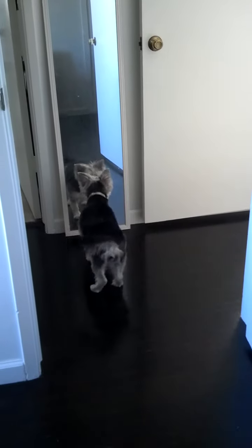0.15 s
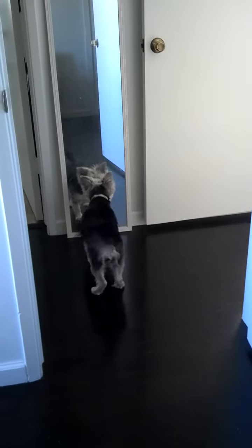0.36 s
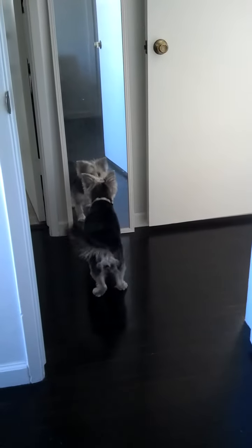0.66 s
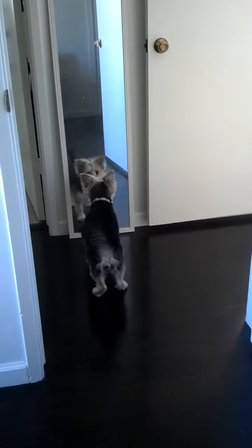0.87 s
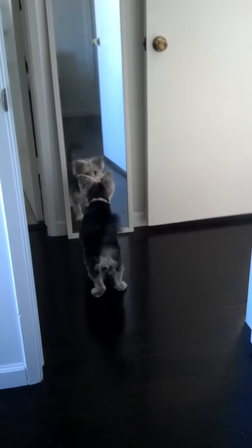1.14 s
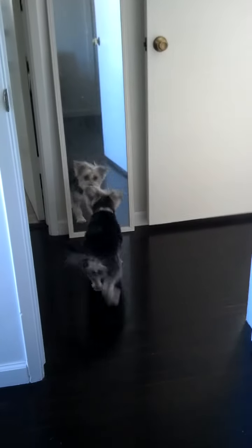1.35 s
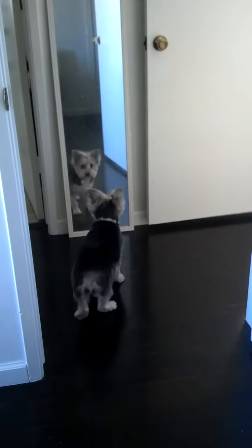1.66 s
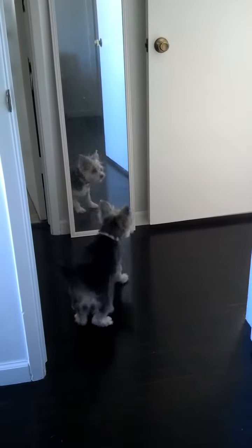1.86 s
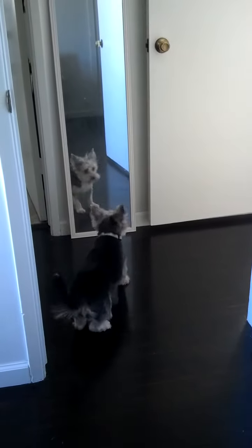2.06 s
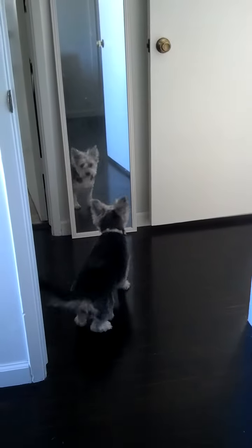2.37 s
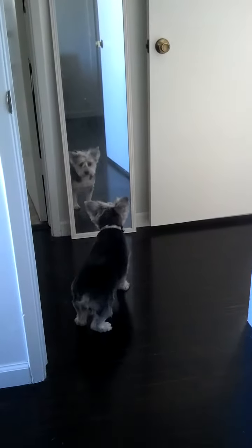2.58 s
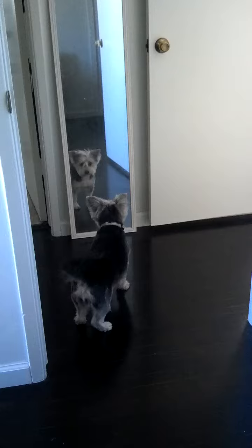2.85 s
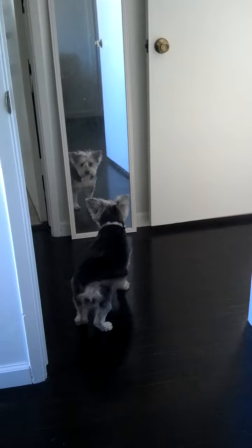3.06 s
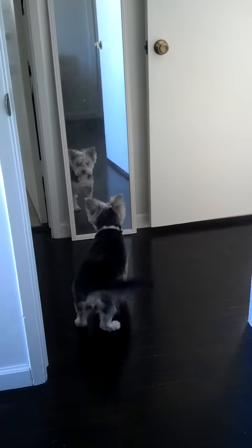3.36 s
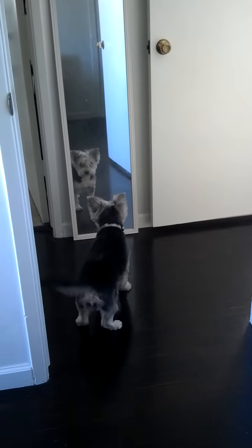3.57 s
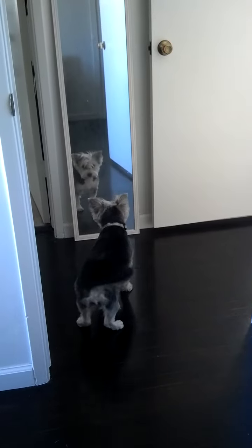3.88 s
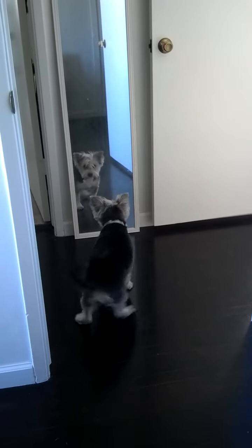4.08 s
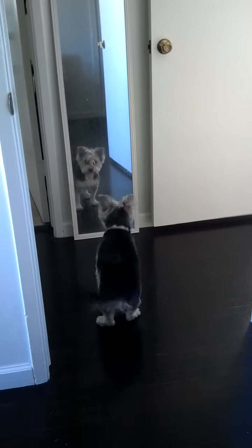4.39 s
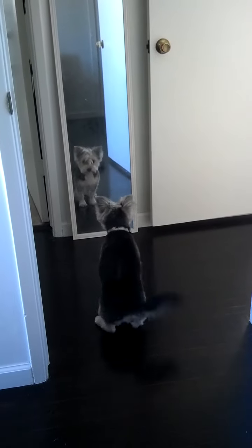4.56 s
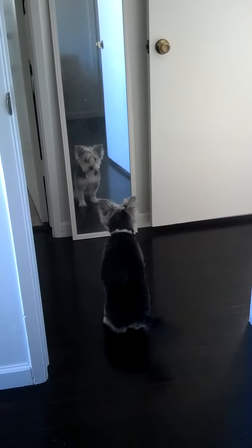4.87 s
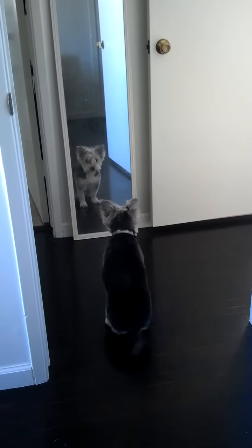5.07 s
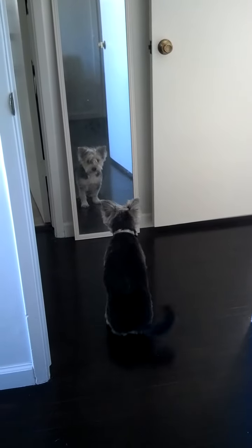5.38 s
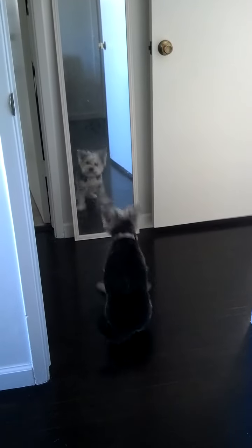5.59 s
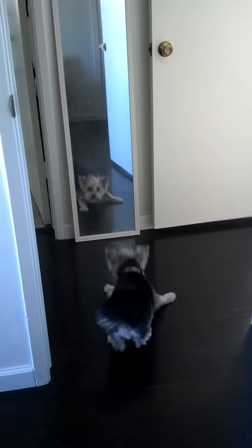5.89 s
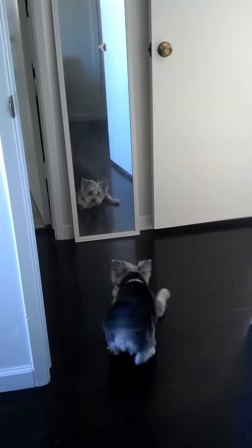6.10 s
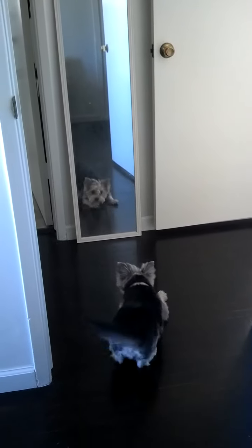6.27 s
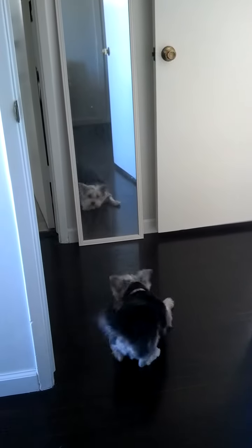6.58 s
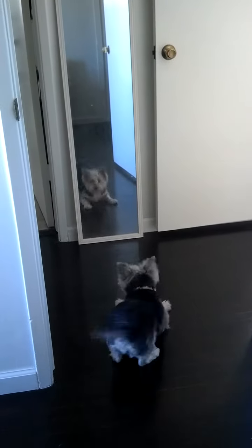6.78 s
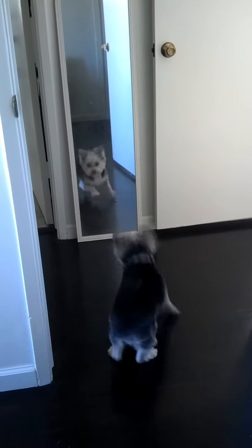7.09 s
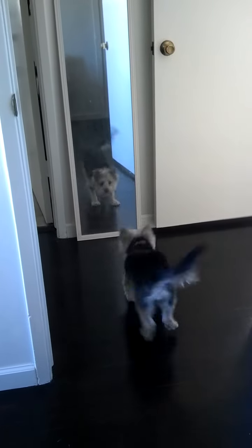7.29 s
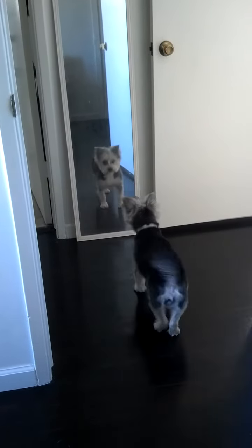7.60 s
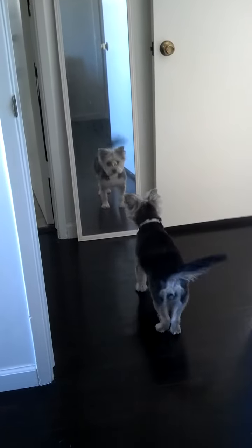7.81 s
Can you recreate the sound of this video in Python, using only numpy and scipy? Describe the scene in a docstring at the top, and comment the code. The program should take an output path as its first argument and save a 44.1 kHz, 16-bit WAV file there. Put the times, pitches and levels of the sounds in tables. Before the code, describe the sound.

In a quiet, bare hallway, a small dog scuffs the wooden floor, whimpers faintly, then barks five times, about half a second apart. Claws click between calls. After a lull of soft whines and ticks comes the sharpest yelping bark, a low grunting bark, then heavier paw thuds and a last bark. A phone close behind catches plenty of room echo over a faint house rush.

```python
"""A small terrier barks, whines and growls at itself in a hallway mirror, a step away from a phone.
Its voice is a source and filter: harmonic vocal folds ring the throat and mouth, beside noisy breath.
Claws, paws and the dog's weight on the wooden floor are decaying or swelling bursts of shaped noise.
The bare hallway adds a diffuse decaying tail, over a faint noise of the house.
The phone widens the sound of its two microphones by subtracting delayed copies."""
import sys
import numpy as np
from scipy import signal
from scipy.fft import rfft, irfft, next_fast_len
from scipy.io import wavfile
from scipy.ndimage import map_coordinates

SR = 44100
rng = np.random.default_rng(int(sys.argv[2]) if len(sys.argv) > 2 else 0)


def unload_wav(signal):
    """Save mono or channel-first audio to the path in sys.argv[1] as 16-bit WAV at rate SR, clipped to [-1, 1]."""
    wavfile.write(
        sys.argv[1],
        SR,
        np.round(np.clip(np.atleast_2d(signal).T, -1, 1) * 32767).astype(np.int16),
    )


N = 350154  # samples


def amp(db):
    """Logarithmic level: decibels to amplitude gain."""
    return 10 ** (np.asarray(db) / 20)


def unit(x):
    """Normalisation: x scaled to rms 1."""
    return x / np.sqrt(np.mean(x ** 2) + 1e-20)


def along(points, hz):
    """Logarithmic frequency scale: (Hz, value) points interpolated on a log axis."""
    point_hz, values = np.transpose(points)
    return np.interp(np.log(hz + 1), np.log(point_hz), values)


def wobble(n, rate):
    """Band-limited fluctuation: a smooth random curve of n samples, rate knots a second."""
    knots = rng.standard_normal(int(n * rate / SR) + 4)
    return map_coordinates(knots, [np.arange(n) * rate / SR])


def filtered(x, response):
    """Linear filtering: the spectrum of x times a response of frequency."""
    size = next_fast_len(x.shape[-1] + SR // 4)
    spectrum = rfft(x, size) * response(np.fft.rfftfreq(size, 1 / SR))
    return irfft(spectrum, size)[..., :x.shape[-1]]


def coloured(x, points, size=2048):
    """Minimum phase: x through a causal filter with the given (Hz, dB) shape."""
    gain = amp(along(points, np.fft.rfftfreq(size, 1 / SR)))
    cepstrum = irfft(np.log(gain))
    # folding the cepstrum onto positive times makes the filter causal
    cepstrum[1:size // 2] *= 2
    cepstrum[size // 2 + 1:] = 0
    impulse = irfft(np.exp(rfft(cepstrum)))
    return signal.oaconvolve(x, impulse)[:len(x)]


def noise(points):
    """Random noise: white noise given a spectral shape and rms 1."""
    return unit(coloured(rng.standard_normal(N), points))


def add(track, s, x):
    """Superposition: mix x into the track at s seconds."""
    part = track[max(round(s * SR), 0):][:len(x)]
    part += x[:len(part)]


# spectrum of the faint rush of the house: frequency_hz [Hz], density_db [dB per Hz, relative]
HOUSE_SPECTRUM = [(25, -10), (70, -1), (150, 14), (500, 4.5), (1000, -7), (4000, -16.5), (10500, -24.5),
                  (15500, -20.5)]


def background(floor_db=-61, shared=1.0):
    """Partial coherence: a faint rush of the house, partly shared by the microphones."""
    common = shared * noise(HOUSE_SPECTRUM)
    separate = np.array([noise(HOUSE_SPECTRUM), noise(HOUSE_SPECTRUM)])
    return amp(floor_db) * (common + separate)


# paws and fur sliding on the floor: peak_s [s, hardest push], level_db [dB, relative],
# length_s [s, between the points where the push is 1/e of its peak]
SCUFF_STROKES = [(0.0, -48.5, 0.12), (1.332, -37, 0.078), (1.606, -39, 0.38), (2.272, -51.5, 0.14),
                 (4.213, -39, 0.069), (4.409, -58.5, 0.16), (4.81, -66, 0.043), (5.621, -39, 0.12),
                 (6.038, -50.5, 0.12), (6.971, -50, 0.4), (7.362, -48, 0.29)]
# spectrum of the rubbing: frequency_hz [Hz], level_db [dB]
SCUFF_SPECTRUM = [(40, -5), (130, 8.5), (800, 4), (1400, -3), (2200, -1), (3200, -5.5), (4500, -1.5),
                  (6000, -7), (16000, -17.5)]


def scuffs(scuff_db=-8, grain_db=4.0, slip_db=2.5):
    """Stick-slip friction: pads and fur catch and slip on the boards; each stroke swells and fades."""
    t = np.arange(N) / SR
    rub = sum(amp(db) * np.exp(-(2 * (t - s) / length_s) ** 2) for s, db, length_s in SCUFF_STROKES)
    # fine grains ride on slower slips
    grains = unit(amp(grain_db * wobble(N, 540) + slip_db * wobble(N, 50)))
    return amp(scuff_db) * rub * grains * noise(SCUFF_SPECTRUM)


EDGE_S = 0.0063  # the voice switches on and off over this time [s]


def gate(n):
    """Onset and offset ramps: a soft on-off gate of n samples."""
    i = np.arange(n)
    return np.clip(np.minimum(i, n - i) / (EDGE_S * SR), 0, 1)


REGISTER_HZ = 785.7  # strained folds swell every second cycle below this pitch, every third above


def folds(pitch, rough, overtones_db, jitter=0.057, undertone=0.43, chaos=0.9, turbulence=0.32,
          slope_db=-4, count=7):
    """Nonlinear oscillation: a harmonic tone that strain breaks into sidebands and rattle; also its phase."""
    n = len(pitch)
    unsteady = .014 * wobble(n, 90) + jitter * rough * wobble(n, 520)
    phase = 2 * np.pi * np.cumsum(pitch * (1 + unsteady)) / SR
    tone = np.sin(phase)
    for k in range(2, count):
        # overtones slope by slope_db per octave from the second harmonic
        tone = tone + amp(overtones_db + slope_db * np.log2(k / 2)) * np.sin(k * phase)
    # strained folds swell once in two or three cycles, which adds subharmonic sidebands
    cycles = np.where(pitch < REGISTER_HZ, 2, 3)
    slow = 2 * np.pi * np.cumsum(pitch / cycles * (1 + .09 * wobble(n, 120))) / SR
    swell = 1 + rough * (.6 * np.cos(slow) + chaos * wobble(n, 1100))
    under = undertone * rough * np.sin(phase - slow)
    # and let a turbulent puff through in each slow cycle
    puffs = turbulence * rough * (1 + np.cos(slow)) * wobble(n, 5000)
    power = (1 + 2 * amp(overtones_db) ** 2) * (1 + rough ** 2) / 2
    return (tone * swell + under + puffs) / np.sqrt(power), phase


def resonance(hz, centre_hz, q):
    """Damped resonator: the second-order response of one cavity."""
    return 1 / (1 - (hz / centre_hz) ** 2 + 1j * hz / (centre_hz * q))


def mouth(x, throat_hz, mouth_hz, throat_q=1.297, mouth_q=6):
    """Formants: throat and mouth each ring at one resonance and pass little outside the pair."""
    def tract(hz):
        throat_ring = resonance(hz, throat_hz, throat_q)
        return (hz / throat_hz) ** 2 * throat_ring * resonance(hz, mouth_hz, mouth_q)

    cliff = signal.butter(N=6, Wn=1.14 * mouth_hz, fs=SR, output="sos")
    padded = np.pad(x, (0, SR // 20))  # room to ring on
    return signal.sosfilt(cliff, filtered(padded, tract))


WHIMPER_PEAK = .27  # loudest at this share of the length
WHIMPER_SWELL_DB, WHIMPER_FADE_DB = 7.5, 16.5  # rise before the peak, fall after it [dB]


def whimper(length_s, first_hz, last_hz, db, rough, overtones_db):
    """Frequency glide: a soft, even glide that swells and fades; the jaw does not move."""
    u = np.arange(0, length_s, 1 / SR) / length_s
    level = db - np.interp(u, [0, WHIMPER_PEAK, 1], [WHIMPER_SWELL_DB, 0, WHIMPER_FADE_DB])
    pitch = first_hz + (last_hz - first_hz) * u
    return pitch, level, rough, overtones_db, 0  # never muffled


SHUT_THROAT_HZ, SHUT_MOUTH_HZ = 281, 1600
# whimpers, grunts and huffs with the mouth nearly shut: start_s [s], length_s [s], first_pitch_hz [Hz],
# last_pitch_hz [Hz], level_db [dB, relative], roughness [0-1], overtones_db [dB], rasp_db [dB, relative]
WHIMPER_CALLS = [ (0.993, 0.091, 941, 1016, -52.5, 0.9, -1, 1), (1.385, .08, 709, 696, -43.5, .3, -23, 2),
                 (3.47, .08, 415, 416, -46, .3, -26, 0.5), (4.168, 0.086, 360.8, 338.6, -39, 0.9, -11, 29),
                 (4.364, 0.15, 409, 449, -47.5, 0.08, -31, 0), (4.45, 0.143, 684, 780, -58.5, 0, -24, 4),
                 (5.604, .045, 331.5, 401, -23.5, .3, -8.5, 1),
                 (6.08, 0.14, 510.4, 421.6, -38.5, 0.58, -31, 6),
                 (6.552, .1, 472.5, 378.3, -24, 0.93, -37, 11), (7.273, 0.071, 692, 710, -40, 0, -25, 1), ]


def whimpers():
    """Fixed formants: each nearly shut call has the same two resonances."""
    return [(s, SHUT_THROAT_HZ, SHUT_MOUTH_HZ, air_db, whimper(*shape))
            for s, *shape, air_db in WHIMPER_CALLS]


# the dog's weight landing on the boards: start_s [s], level_db [dB, relative]
PAW_LANDINGS = [(1.309, -40), (4.169, -43), (4.8, -41.5), (5.607, -37), (6.561, -47), (7.151, -27),
                (7.197, -57), (7.258, -28.5)]
# spectrum of the struck boards: frequency_hz [Hz], level_db [dB]
BOARD_SPECTRUM = [(40, -14.5), (160, 4.5), (330, -6.5), (600, -18.5), (4000, -54)]


def thuds(thud_db=-7, thud_t60=0.16):
    """Damped impact: soft paws give a dull, toneless bump on the floorboards."""
    track, t = np.zeros(N), np.arange(SR // 4) / SR
    for s, db in PAW_LANDINGS:
        decay = amp(db + thud_db - 60 * t / thud_t60)  # t60 in s
        add(track, s, decay * (1 - np.exp(-t / 0.0005)))
    return track * noise(BOARD_SPECTRUM)


# claws on the boards: start_s [s], level_db [dB, relative]
CLAW_TICKS = [(1.3106, -17), (1.3711, -20.5), (1.4506, -30), (1.626, -22.5), (1.8118, -28.5), (4.3346, -29),
              (4.517, -24), (4.7387, -25.5), (4.748, -30.5), (4.7899, -25.5), (5.5494, -33.5), (5.989, -47),
              (6.0232, -50), (6.825, -38.5), (6.8944, -35.5), (7.038, -30), (7.3358, -23.5),
              (7.5071, -26.5), (7.6162, -32)]
# spectrum of a claw on varnish: frequency_hz [Hz], level_db [dB]
CLAW_SPECTRUM = [(300, -16), (800, -5.5), (1400, -6.5), (2200, 3.5), (4500, 3), (10000, 1.5), (16000, -10)]


def claws(tick_db=-9, tick_t60=0.011, skid_db=-13, skid_t60=0.064):
    """Impact and friction: each claw gives a dry tick and skids a little on the varnish."""
    ticks, t = np.zeros(N), np.arange(SR // 6) / SR
    for s, db in CLAW_TICKS:
        skid = amp(skid_db - 60 * t / skid_t60 + 0.8 * wobble(len(t), 300))
        decay = amp(-60 * t / tick_t60) + skid
        attack = 1 - np.exp(-t / 0.00047)
        add(ticks, s, amp(db + tick_db) * decay * attack * rng.standard_normal(len(t)))
    return coloured(ticks, CLAW_SPECTRUM)


SCOOP, SCOOP_CURVE = .53, 1.3  # a bark starts this share below its pitch and scoops up during the attack
LIFT_S, SAG = 0.02634, 0.069  # how quickly the pitch lifts [s]; share of it lost as the air runs out
SWELL_DB, FADE_CURVE = 18, 1.11  # rise over the attack; above 1 the level holds before it fades
ONSET_ROUGH, STRAIN_CURVE = 0.49, 0.9  # extra roughness before the folds settle; below 1 they break up early
CLOSING_DB, THINNING_DB_PER_OCTAVE = 15.5, 13  # overtones lost as the jaw closes and as the pitch lifts
JAW_CURVE = 0.68  # the jaw opens during the attack; until then the voice is muffled


def bark(attack_s, lift_s, length_s, first_hz, lifted_hz, db, fade_db, peak_rough, end_rough, overtones_db):
    """Breath pressure: the voice scoops up and swells, its pitch lifts, then it fades, dulls and roughness drifts."""
    t = np.arange(0, length_s, 1 / SR)
    slack = np.clip(1 - t / attack_s, 0, 1)
    spent = np.clip((t - attack_s) / (length_s - attack_s), 0, 1)
    lift = (lifted_hz / first_hz) ** (.5 + .5 * np.tanh((t - lift_s) / LIFT_S))
    pitch = first_hz * lift * (1 - SCOOP * slack ** SCOOP_CURVE) * (1 - SAG * spent ** 3)
    level = db - SWELL_DB * slack - fade_db * spent ** FADE_CURVE
    rough = peak_rough + ONSET_ROUGH * slack + (end_rough - peak_rough) * spent ** STRAIN_CURVE
    overtones = overtones_db - CLOSING_DB * spent - THINNING_DB_PER_OCTAVE * np.log2(lift)
    muffled = 1 - (1 - slack) ** JAW_CURVE
    return pitch, level, rough, overtones, muffled


# barks: start_s [s], attack_s [s], lift_s [s after the start], length_s [s],
# first_pitch_hz [Hz, before scoop and sag], lifted_pitch_hz [Hz, before sag], level_db [dB, relative],
# fade_db [dB], peak_roughness and end_roughness [share, limited to 0-1 when voiced],
# overtones_db [dB, before closing and thinning], throat_hz [Hz], mouth_hz [Hz], rasp_db [dB, relative]
BARK_CALLS = [ (1.473, 0.095, 0.2, .322, 720.4, 960.3, -18, 4, 0.35, .95, -2, 486, 1920, -1),
              (1.959, 0.05, 0.069, .17, 804, 932, -14.5, 13, 0.34, 1.06, -11.5, 560, 1720, 4.5),
              (2.404, 0.081, 0.1115, .205, 817.6, 877.6, -15, 17.5, .3, 1.2, -11.5, 526, 1603, 0.5),
              (2.947, .072, .1, 0.29, 703.6, 729.7, -19.5, 13.5, 0.27, 0.43, 2.5, 560, 2040, -5),
              (3.603, .044, 0.06, .18, 717.4, 881, -14, 13, 0.4, 0.9, -6.5, 540, 1710, 2.5),
              (5.6, .03, 0.088, 0.14, 700, 1146, -10.5, 12, 0.29, 0, 4.5, 320, 1710, 1),
              (6.268, 0.07, 0.085, 0.26, 662.6, 724, -24.5, 4, 0.56, .7, -1, 334, 2020, 5),
              (7.323, .04, .073, 0.19, 696.5, 947.3, -15, 11.5, 0.14, 1.23, -14, 480, 1780, -4.5), ]


def barks():
    """Varying formants: each bark has its own throat and mouth resonances."""
    return [(s, throat_hz, mouth_hz, air_db, bark(*shape))
            for s, *shape, throat_hz, mouth_hz, air_db in BARK_CALLS]


MUFFLED_DB = 5.5  # gain of the muffled voice
# overall colour of the voice: frequency_hz [Hz], level_db [dB]
VOICE_SPECTRUM = [(110, -4.5), (300, -5), (550, -2.5), (800, -4), (1100, -4), (1500, -17), (2100, -19.5),
                  (3000, -25)]
# air through the teeth: frequency_hz [Hz], level_db [dB]
TEETH_SPECTRUM = [(2600, -25.5), (3400, 10), (4050, -9.5), (4600, 11.5), (5400, -1), (7200, 0), (9000, 9.5),
                  (11000, -16), (15500, -5.5)]
# low woof of the chest: frequency_hz [Hz], level_db [dB]
CHEST_SPECTRUM = [(35, -45.5), (80, -28.5), (180, -1), (400, -32)]


def dog(voice_db=-5, rasp_db=-38, rasp_growth=1.0, chest_db=-33):
    """Source and filter: folds sound through throat and mouth; air rasps past the teeth, the chest woofs."""
    # the band that gets out through a shut mouth
    muffle = signal.butter(N=2, Wn=(200, 480), btype="band", fs=SR, output="sos")
    voice, teeth, chest = np.zeros((3, N))
    for s, throat_hz, mouth_hz, air_db, shape in barks() + whimpers():
        pitch, db, rough, overtones_db, muffled = shape
        tone, phase = folds(pitch, np.clip(rough, 0, 1), overtones_db)
        source = gate(len(db)) * amp(db) * tone
        add(voice, s, mouth((1 - muffled) * source, throat_hz, mouth_hz))
        add(voice, s, amp(MUFFLED_DB) * signal.sosfilt(muffle, muffled * source))
        # the breath pulses with the folds
        air = gate(len(db)) * amp(rasp_growth * db) * (1 + .5 * np.cos(phase))
        add(teeth, s, amp(air_db) * air)
        add(chest, s, air)
    throaty = amp(voice_db) * coloured(voice, VOICE_SPECTRUM)
    rasp = amp(rasp_db) * teeth * noise(TEETH_SPECTRUM)
    woof = amp(chest_db) * chest * noise(CHEST_SPECTRUM)
    return throaty + rasp + woof


MIC_GAP_M = 0.14
# decay of the hallway: frequency_hz [Hz], t60_s [s to fall 60 dB]
HALL_DECAY = [(150, 1.1), (270, 0.74), (420, 0.56), (700, 0.46), (2200, 0.52), (4500, 0.39), (16000, 0.25)]


def hallway(x, wet_db, build_s=0.0013):
    """Diffuse field: direct sound plus echoes from all round, alike at both microphones only in the bass."""
    hz, t, z = signal.stft(rng.standard_normal((2, SR)), SR, nperseg=256)
    # the sinc is the coherence of a diffuse field; it sets the balance of mid and side
    turn = np.arccos(np.sinc(2 * hz * MIC_GAP_M / 343))[:, None] / 2
    decay = amp(-60 * t / along(HALL_DECAY, hz)[:, None])
    z = z * np.array([np.cos(turn), np.sin(turn)]) * decay * (1 - np.exp(-t / build_s))
    mid, side = signal.istft(z, SR, nperseg=256)[1]
    tail = np.array([mid + side, mid - side])
    echoes = signal.fftconvolve(x[None], tail / np.linalg.norm(tail[0]), axes=1)[:, :N]
    return x + amp(wet_db) * echoes


def from_left(pair, lag_s=.00007):
    """Arrival-time difference: the sound reaches the left microphone slightly before the right."""
    return filtered(pair, lambda hz: np.exp(-2j * np.pi * hz * np.array([[0], [lag_s]])))


def scene():
    """Direct-to-reverberant ratio: the dog faces away, so its voice is largely echo, as are its steps."""
    voice = from_left(hallway(dog(), wet_db=-0.5))
    feet = hallway(claws() + scuffs() + thuds(), wet_db=1.5)
    return voice + feet + background()


TOP_HZ = 16100  # nothing passes from here up


def record(dry, left_db=1.75, delay=16):
    """Delay and subtract: the phone widens the stereo by taking a delayed copy of each microphone from the other."""
    mics = dry * amp([[left_db], [-left_db]])
    crossed = np.pad(mics[::-1], ((0, 0), (delay, 0)))[:, :N]  # delay in samples
    return filtered(mics - crossed, lambda hz: hz < TOP_HZ)


dry = scene()
out = record(dry)
unload_wav(out)
```